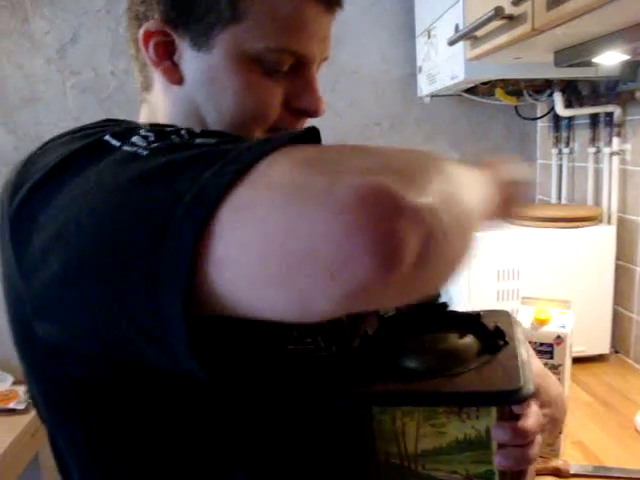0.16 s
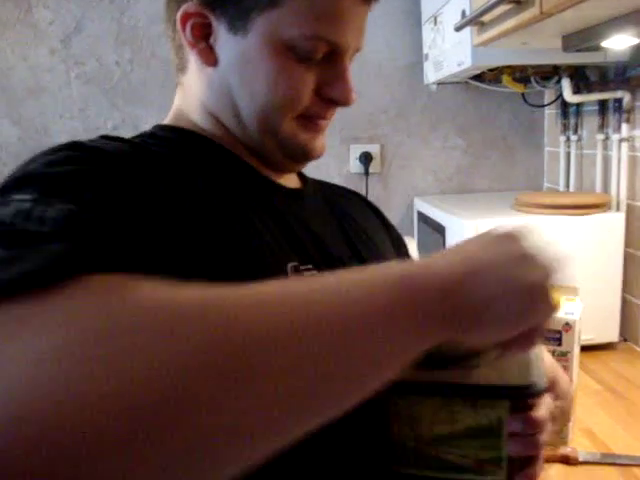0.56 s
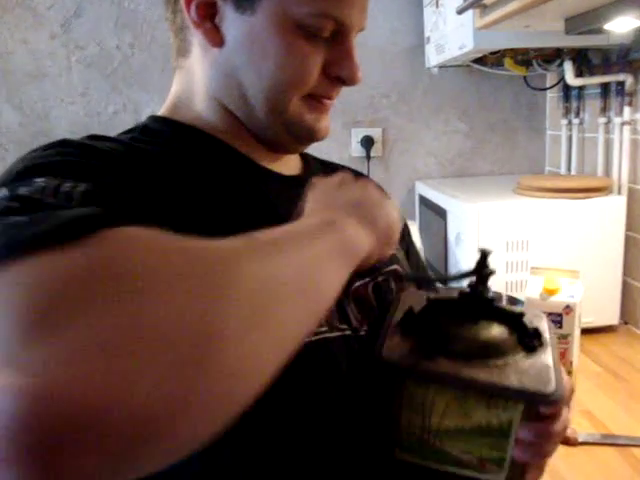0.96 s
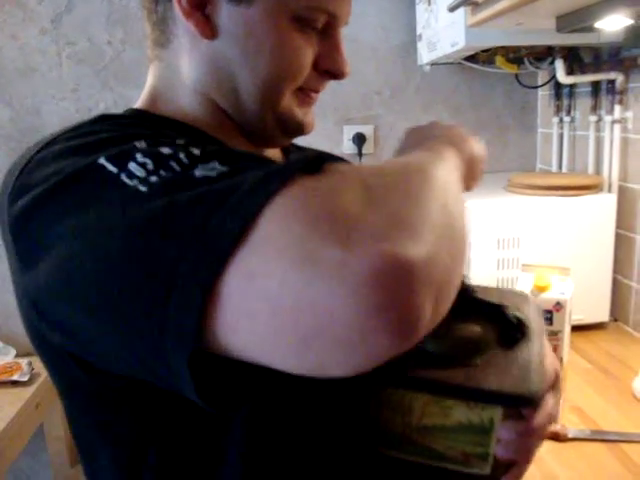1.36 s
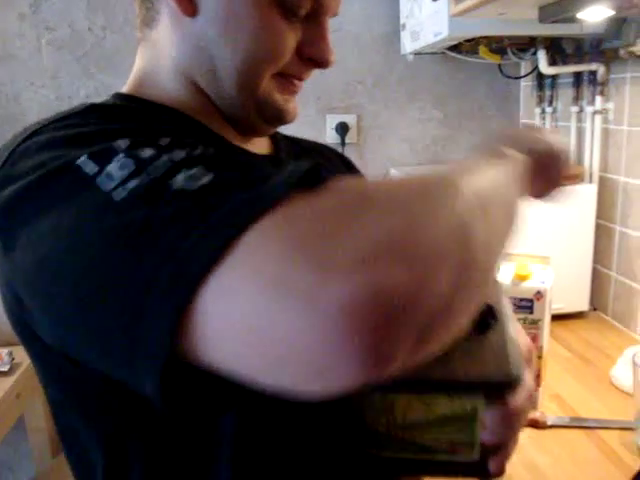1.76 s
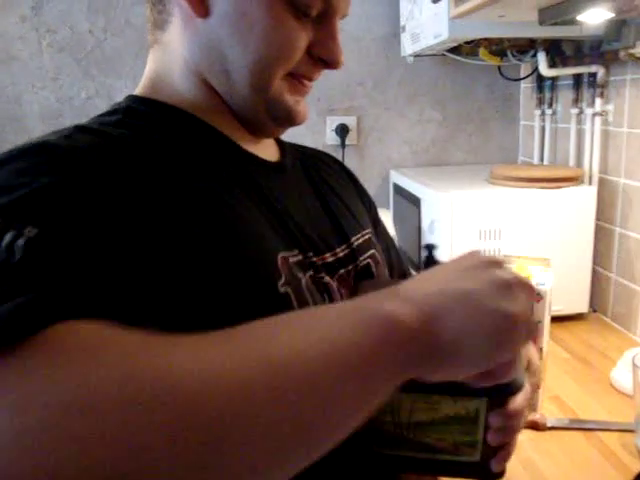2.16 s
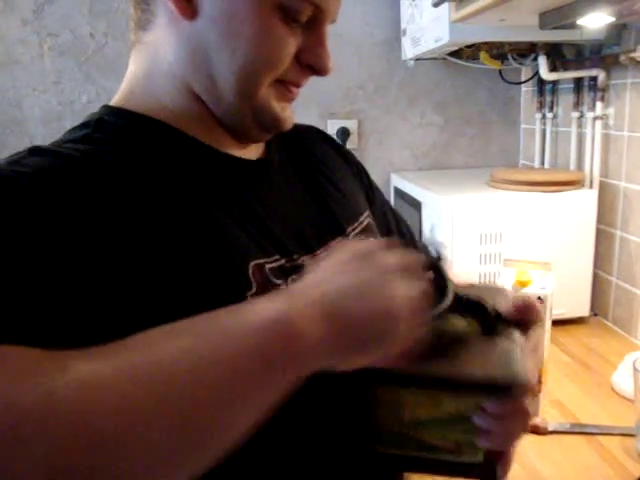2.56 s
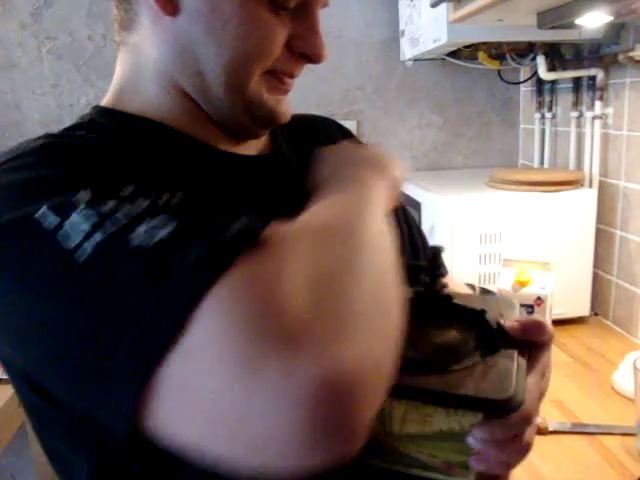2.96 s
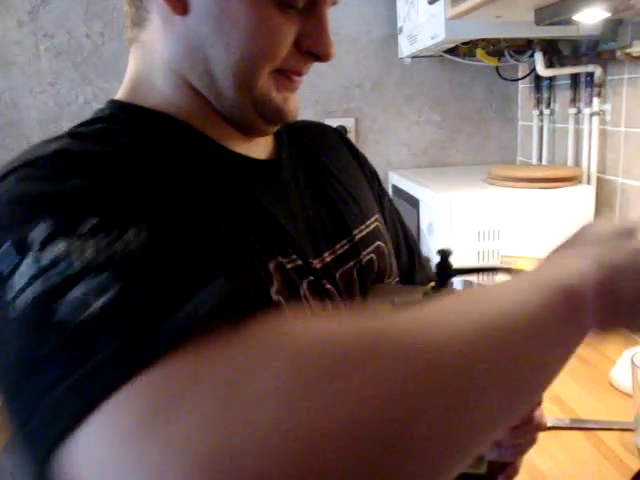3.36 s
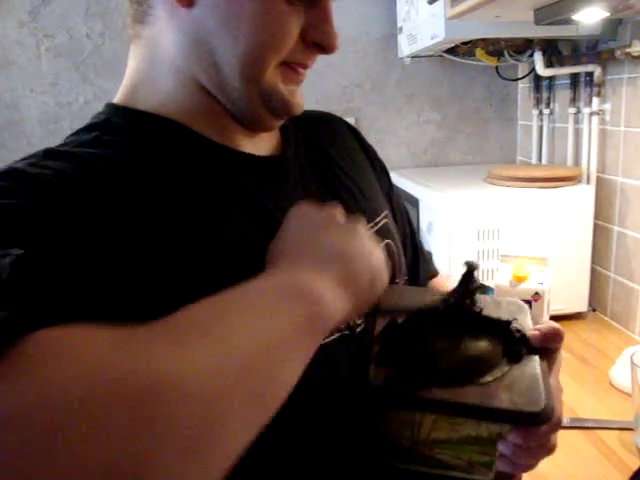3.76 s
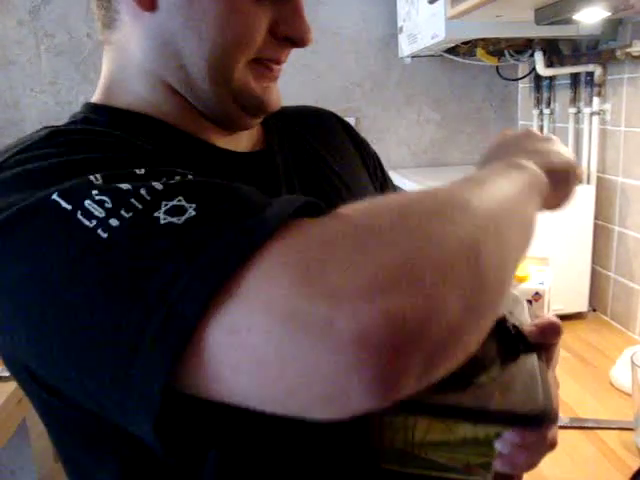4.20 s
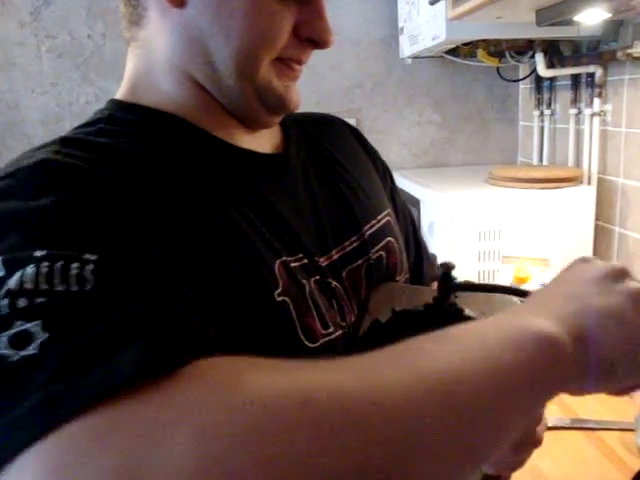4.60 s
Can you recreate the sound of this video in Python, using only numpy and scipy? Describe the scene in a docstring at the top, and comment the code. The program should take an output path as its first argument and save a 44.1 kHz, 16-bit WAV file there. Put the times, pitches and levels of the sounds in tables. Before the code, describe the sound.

A hand-cranked coffee grinder is crunching beans from the very start, close to a thin-sounding microphone in a small tiled kitchen. The crank moves in uneven shoves, each a dense, gritty crackle with a hollow ring from the box, a dry metal rasp and sharp cracks as larger beans break. The first strokes run until about 0.9 seconds, followed by shorter bursts. The crank sticks briefly around 1.4 seconds and again from about 2.2 to 2.5 seconds. Grinding then resumes in a busier run, with a long stroke from 3 to 3.4 seconds. At about 3.5 seconds the shaft gives a brief, very high squeak. More crunching strokes follow, and near 4.7 seconds the last one stops with another tiny squeak and a soft knock. A slight room echo and faint steady hiss lie underneath.

```python
"""A hand-cranked coffee mill grinds in a small tiled kitchen, close to a thin-sounding microphone.
From the start the crank turns in jerks: beans splinter in tiny clicks that ring the wooden box and the
iron burr (the grinding part), and the largest breaks stand out as cracks. The crank sticks now and then.
At 3.5 seconds the shaft gives a very high squeal. Near the end it squeals again, and the last stroke
stops with a soft knock."""
import sys
import numpy as np
from scipy import signal
from scipy.io import wavfile
from scipy.ndimage import uniform_filter1d

SR = 44100
rng = np.random.default_rng(int(sys.argv[2]) if len(sys.argv) > 2 else 0)


def inscribe(sig):
    """Save sig as 16-bit PCM at rate SR to the path in sys.argv[1].

    A 1-D sig is mono; a 2-D sig holds one channel per row.
    Samples are clipped to [-1, 1] before scaling.
    """
    pcm = np.round(np.clip(np.atleast_2d(sig).T, -1, 1) * 32767)
    wavfile.write(sys.argv[1], SR, pcm.astype(np.int16))


N = 208725


def gain_of(db):
    """Turn decibels into a number to multiply by."""
    return 10 ** (np.asarray(db) / 20)


def evened(x):
    """Scale a signal to an average power of 1."""
    return x / np.sqrt(np.mean(x ** 2) + 1e-20)


def value_at(points, hz):
    """Read values off a curve drawn through (Hz, value) points."""
    point_hz, value = np.transpose(points)
    return np.interp(np.log(hz + 1), np.log(point_hz + 1), value)


def add(mix, start_s, sound):
    """Mix a sound in at its start time."""
    part = mix[round(start_s * SR):][:len(sound)]
    part += sound[:len(part)]


def wobble(span):
    """A smooth random curve that changes over about span samples."""
    return evened(uniform_filter1d(uniform_filter1d(rng.standard_normal(N), span), span))


def kitchen_noise(level_db=-39):
    """The steady, slightly patchy background noise of the room."""
    # Each row: frequency in Hz, relative strength of the noise there in dB.
    noise_curve = [(18, -69), (30, -18.5), (150, -15), (263, -14.5), (418, -3), (602, -3.5), (1010, 8),
                   (1310, -4), (2140, 8), (2870, 4.5), (6420, -13.5), (10200, -50), (13300, -72),
                   (22000, -120)]
    frames, hz = N // 256 + 5, np.fft.rfftfreq(1024, 1 / SR)
    real, imaginary, patches = rng.standard_normal((frames, 513, 3)).T
    patches = evened(uniform_filter1d(uniform_filter1d(patches, 12, 0), 8, 1))
    spectrum = (real + 1j * imaginary) * gain_of(value_at(noise_curve, hz)[:, None] + 1.8 * patches)
    return gain_of(level_db) * evened(signal.istft(spectrum, nperseg=1024, noverlap=768)[1][:N])


def wall_echo(sound):
    """The tiled walls send back many small echoes; each frequency dies away at its own speed."""
    # Each row: frequency in Hz, seconds the echo takes to fall by 60 dB.
    fade_times = [(300, 0.18), (1700, 0.59), (4600, 0.3), (10000, 0.024)]
    echoes = np.zeros(SR // 2)
    slots = np.arange(200, len(echoes) - 20, 20)
    echoes[slots + rng.integers(0, 20, len(slots))] = rng.choice([-1., 1.], len(slots))
    hz, t, spectrum = signal.stft(echoes, SR, nperseg=256)
    fade = gain_of(-60 * t / value_at(fade_times, hz)[:, None])
    tail = signal.istft(spectrum * fade, SR, nperseg=256)[1]
    return signal.fftconvolve(sound, tail / np.linalg.norm(tail))[:N]


def low_rumble(push, knock_s=4.681):
    """A faint low rumble swells and fades with each push of the crank; the last ends in a soft knock."""
    low_noise = signal.sosfilt(signal.butter(2, 230, fs=SR, output="sos"), rng.standard_normal(N))
    out = gain_of(-46.5 + 1.9 * wobble(700)) * push ** 0.79 * evened(low_noise)
    add(out, knock_s, gain_of(-35) * np.hanning(round(0.003 * SR)))
    return out


def shaft_squeal(pitch_hz=9670, slips_per_s=222):
    """Dry metal sticks and slips: a wavering whistle broken into uneven throbs."""
    # Each row: start in seconds, length in seconds, first level in dB, last level in dB.
    squeals = [(3.516, 0.033, -13.5, -22), (3.556, 0.061, -22, -40), (4.679, 0.0273, -21, -13.5)]
    out = np.zeros(N)
    for start, length, first_db, last_db in squeals:
        waver, pace = (evened(uniform_filter1d(rng.standard_normal(3000), span)) for span in (40, 200))
        throb = abs(np.sin(np.pi * np.cumsum(slips_per_s * (1 + 0.44 * pace)) / SR)) ** 1.1
        whistle = np.sin(2 * np.pi * np.cumsum(pitch_hz * (1 + 0.024 * waver)) / SR) * throb
        size = round(length * SR)
        loudness = gain_of(np.linspace(first_db, last_db, size)) * signal.windows.tukey(size, .1)
        add(out, start, loudness * whistle[:size])
    return out


def burr_drags():
    """The burr drags: a patter of tiny slips makes one part of the mill sing out, then fade."""
    # Each row: start in seconds, length in seconds, pitch in Hz, level in dB compared with the crunch.
    drags = [(0.085, .13, 1250, -9), (.502, 0.21, 864, -3.5), (0.597, 0.11, 5350, -9),
             (0.67, 0.05, 2520, -3.5), (0.767, 0.069, 1250, 3), (1.599, 0.096, 2400, -1.5),
             (1.774, 0.12, 916, -10.5), (2.036, .1, 960, -10.5), (2.945, 0.12, 1250, -6),
             (3.158, 0.097, 1250, -1.5), (3.706, 0.076, 1210, -9.5), (3.822, .17, 1240, -0.5),
             (4.015, 0.11, 1020, -11), (4.245, 0.21, 1180, -0.5), (4.472, 0.11, 2060, -5)]
    out, shape = np.zeros(N), (len(drags), SR // 4)
    patters = gain_of(3 * rng.exponential(1, shape)) * rng.standard_normal(shape)
    for (start, length, hz, db), patter in zip(drags, patters):
        width_hz = 115 * (hz / 1000) ** 0.67  # higher rings are wider, so they die sooner
        decay = np.exp(-np.pi * width_hz / SR)
        feedback = [1, -2 * decay * np.cos(2 * np.pi * hz / SR), decay * decay]
        ring = evened(signal.lfilter([1, 0, -1], feedback, patter))
        size = round(length * SR)
        add(out, start, gain_of(db) * ring[-size:] * signal.windows.tukey(size, .5))
    return out


def crank_effort():
    """Loudness of boom, crunch and rasp: each shove bites, swells, holds, lets go and trickles out."""
    # Each row: start, rise and hold in seconds, effort in dB, its change over the hold in dB,
    # extra dB for the box's boom, extra dB for the burr's rasp.
    shoves = [(0, 0.0009, 0.034, -13, -9, -9, -14), (0.03, 0.0092, .04, -27, 0, -12, -23),
              (0.084, 0.054, 0.27, -17.5, -2.5, -7.5, -13), (0.47, 0.089, 0.16, -17, -1.5, -6.5, -13),
              (0.784, 0.055, 0.0086, -17.5, 3.5, -11, -8.5), (1.009, 0.018, 0.066, -15.5, -3.5, -10.5, -9),
              (1.205, 0.0084, 0.041, -18.5, 0, -9.5, -9), (1.414, 0.0036, 0.0083, -34, -18, -28, -2.5),
              (1.586, 0.033, 0.068, -20.5, -6.5, -11.5, -11.5), (1.713, .006, .008, -29.5, 1, -16, -18),
              (1.744, 0.026, 0.1, -15, -1, -9, -14), (1.886, 0.011, 0.22, -25, 5, -6.5, -11),
              (2.182, 0.0027, 0.0081, -27, -1.5, -8.5, -16), (2.35, 0.016, 0.032, -38, 0.5, -9, -8),
              (2.518, 0.026, 0.082, -18, -1, -11.5, -10.5), (2.678, 0.022, .01, -28, -3, 0, -13.5),
              (2.709, 0.032, 0.037, -15, -2, -11, -11), (2.804, 0.064, 0.039, -17, -6.5, -9, -9),
              (2.942, 0.014, .015, -19.5, -3, -13, -9.5), (2.98, 0.029, 0.38, -16.5, -6, -6, -12.5),
              (3.417, 0.069, 0.034, -15.5, -8.5, -7, -12.5), (3.532, 0.011, 0.066, -17, -12, -12.5, -11),
              (3.66, 0.016, .008, -27, 3, -10, -15), (3.678, 0.05, 0.029, -18, 0.5, -10.5, -12),
              (3.809, 0.044, 0.11, -20, -2.5, -13, -9), (3.983, 0.037, 0.11, -18.5, 0.5, -9.5, -9),
              (4.207, 0.055, 0.14, -19, -2.5, -5.5, -11.5), (4.474, 0.0057, 0.078, -23.5, -1, -9.5, -13.5),
              (4.62, 0.023, 0.022, -19, 1.5, -12.5, -13), (4.69, .005, .04, -36, -4, -14, -0.5)]
    # These three settings each give boom, crunch and rasp, in that order.
    bite_db = (-5.5, -8, -5.5)  # a shove starts this far below its top
    let_go_db_per_s = (329, 379, 455)
    stuck_db = (-48, -44.5, -57)  # what is left between shoves
    t = np.arange(0, N + 32, 32) / SR
    power = gain_of(stuck_db)[:, None] ** 2
    for start, rise, hold, top_db, change_db, boom_db, rasp_db in shoves:
        rise = max(rise, .001)
        rise_left = np.clip(1 - (t - start) / rise, 0, 1)
        hold_done = np.clip((t - start - rise) / hold, 0, 1)
        push_db = top_db + np.outer(bite_db, rise_left) + change_db * hold_done
        push = gain_of(push_db + np.array([[boom_db], [0], [rasp_db]]))
        after_s = np.maximum(t - start - rise - hold, 0)
        let_go = gain_of(-np.outer(let_go_db_per_s, after_s))
        trickle = gain_of(-22 - 111 * after_s)  # fragments keep falling for a while
        power = power + (t >= start) * (let_go ** 2 + trickle ** 2) * push ** 2
    return np.array([np.interp(np.arange(N) / SR, t, np.sqrt(layer)) for layer in power])


def splinters(tones, per_s, spread_db, scatter_db, detune, sharpest, snap_gain, spots):
    """Beans splinter in random clicks, a few large; each spot rings its own mix of the given tones."""
    clicks = gain_of(spread_db * np.minimum(rng.exponential(1, N), 5)) * (rng.random(N) < per_s / SR)
    clicks *= rng.choice([-1., 1.], N)
    turning = np.arange(N) / SR * 24 + 2.5 * rng.random(N)  # the breaking spot wanders round the burr
    click_spot = turning.astype(int) % spots
    out, t = np.zeros(N), np.arange(3000) / SR
    hz, width, db = np.transpose(tones)[:, :, None]
    width = np.maximum(width, hz / sharpest)  # hands, beans and grounds shorten the ringing
    snap_band = signal.butter(4, [1.048 * hz.min(), hz.max()], "band", fs=SR, output="sos")
    low_cut = signal.butter(4, hz.min(), "high", fs=SR, output="sos")
    swing = (-1.) ** np.arange(len(tones))[:, None]  # neighbouring tones start in opposite directions
    for spot in range(spots):
        share, shift = rng.standard_normal((2, len(tones), 1))
        fades = gain_of(db + scatter_db * share) * width * np.exp(-np.pi * width * t)
        ring = (swing * fades * np.sin(2 * np.pi * hz * (1 + detune * shift) * t)).sum(0)
        ring = signal.sosfilt(low_cut, ring)  # little sound gets out below the lowest tone
        snap = signal.sosfilt(snap_band, rng.standard_normal(len(t)) * np.exp(-t / 0.0005))
        one_break = evened(ring) + snap_gain * evened(snap)
        out += signal.oaconvolve(clicks * (click_spot == spot), one_break)[:N]
    return evened(out)


def grinding(boom_push, crunch_push, rasp_push, box_lag_s=0.0084):
    """The box booms, its panels crunch and the burr rasps with the effort, shuddering as beans catch."""
    # The tones each part rings with. Each row: pitch in Hz, width in Hz (wider dies sooner;
    # splinters widens the narrow ones), relative level in dB.
    box_tones = [(228, 27, 3), (362, 70, -36), (428.6, 11, 20.5), (492, 15, 19.5), (495, 29, 22),
                 (545, 60, -14)]
    panel_tones = [(629, 60, -30), (789, 30, -0.5), (861, 44, 0.5), (910.4, 122, 5), (1050, 165, -5.5),
                   (1149, 76, 4), (1250, 89, 5.5), (1317, 99, 2), (1560, 243, -2.5), (1782, 41, 1.5),
                   (1852, 89, -5), (2009, 99, -1.5), (2566, 430, -10), (2563, 140, -1.5), (2640, 140, -7.5),
                   (2860, 57, -5.5), (3460, 490, -74)]
    burr_tones = [(4070, 1500, -6), (5610, 430, 7.5), (6354, 870, 4.5), (6600, 1100, -12.5),
                  (8980, 500, -8.5)]
    shudder_db = 0.7 * wobble(280) + 0.51 * wobble(740)
    boom = splinters(box_tones, per_s=900, spread_db=2.5, scatter_db=2.5,
                     detune=.008, sharpest=18, snap_gain=.05, spots=20)
    crunch = splinters(panel_tones, per_s=2400, spread_db=2.3, scatter_db=5,
                       detune=.015, sharpest=17, snap_gain=.7, spots=40)
    rasp = splinters(burr_tones, per_s=3600, spread_db=2.2, scatter_db=7,
                     detune=.035, sharpest=11, snap_gain=.8, spots=40)
    boom *= gain_of(1.16 * wobble(1200))  # the grip on the box keeps shifting
    rasp *= gain_of(2.63 * wobble(180) + 1.36 * wobble(1100))  # the grit comes in clumps
    lag = np.exp(-1 / (box_lag_s * SR))
    swell = signal.lfilter([1 - lag], [1, -lag], boom_push)  # the boom takes a moment to build up
    return gain_of(shudder_db) * (swell * boom + crunch_push * (crunch + burr_drags()) + rasp_push * rasp)


def bean_cracks():
    """A bean breaks loudly: a short ring at its own pitch, a bright spit and a spray of fragments."""
    # Each row: start in seconds, relative level in dB, pitch in Hz.
    cracks = [(0.09, 4, 1250), (.126, 6, 1190), (0.223, 9, 775), (.474, -7, 1220), (.545, 2, 940),
              (.679, 5.5, 796), (.789, -9, 1240), (0.84, 2, 1560), (1.009, -9, 1100), (1.068, 6, 1190),
              (1.077, 3, 1300), (1.208, 1, 1130), (1.603, -3, 2500), (1.843, -0.5, 1290),
              (1.897, -1.5, 1310), (2.094, -2.5, 1010), (2.187, 0, 2860), (2.193, -7, 3280),
              (2.529, -2, 1900), (2.59, 5.5, 1340), (2.726, -4, 1250), (2.817, 6, 1110),
              (2.943, -3.5, 1990), (2.961, 3, 1250), (3.025, 5.5, 1250), (3.178, 4.5, 1230),
              (3.539, -7, 940), (3.687, -1.5, 1350), (3.704, -4, 1450), (3.728, -2, 1170), (3.946, 2, 1270),
              (4.208, -2, 1200), (4.273, 1, 860), (4.394, -15, 1110), (4.479, -14, 1600), (4.621, -7, 2030),
              (4.703, -0.5, 2900)]
    out, t = np.zeros(N), np.arange(1500) / SR
    treble = signal.butter(2, 3800, "high", fs=SR, output="sos")
    middle = signal.butter(2, [600, 3800], "band", fs=SR, output="sos")
    fade_in = np.minimum(t / 0.00023, 1)
    for start, db, hz in cracks:
        spray_noise, spit_noise = rng.standard_normal((2, len(t)))
        ring = 0.27 * np.sin(2 * np.pi * hz * t) * np.exp(-t / .0018)
        spray = 0.074 * evened(signal.sosfilt(middle, spray_noise)) * np.exp(-t / 0.014)
        spit = gain_of(-21) * evened(signal.sosfilt(treble, spit_noise)) * np.exp(-t / 0.0013)
        add(out, start, gain_of(db) * (ring + spray + spit) * fade_in)
    return out


def scene():
    """The mill and its echo lose their bass in a small microphone; room noise and rumble lie beneath."""
    boom_push, crunch_push, rasp_push = crank_effort()
    mill = grinding(boom_push, crunch_push, rasp_push) + bean_cracks() + shaft_squeal()
    in_room = mill + gain_of(-17.5) * wall_echo(mill)
    thinned = signal.sosfilt(signal.butter(4, 290, "high", fs=SR, output="sos"), in_room)
    return (thinned + kitchen_noise() + low_rumble(crunch_push))[None]


def record(dry, ceiling=.95, top_hz=10130):
    """The microphone's input rounds off the tallest peaks, then the highest treble is cut away."""
    rounded = dry / (1 + (dry / ceiling) ** 6) ** (1 / 6)
    treble_cut = signal.firwin(1023, top_hz, window=("kaiser", 10), fs=SR)
    return signal.oaconvolve(rounded, treble_cut[None], "same")


dry = scene()
out = record(dry)
inscribe(out)
```